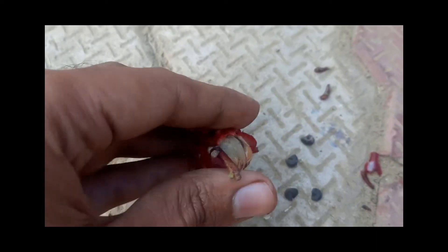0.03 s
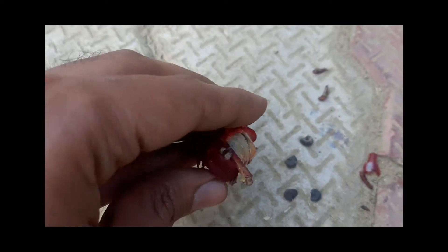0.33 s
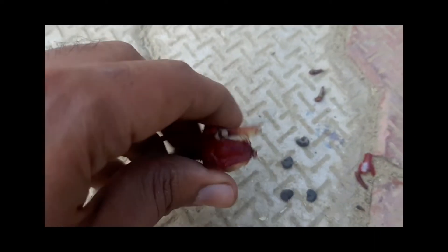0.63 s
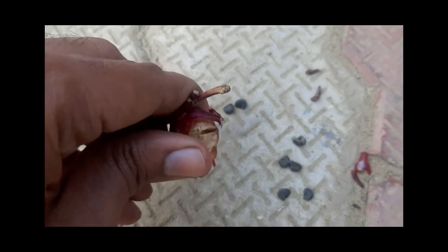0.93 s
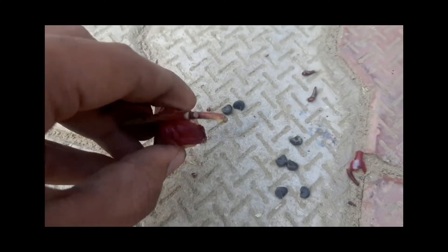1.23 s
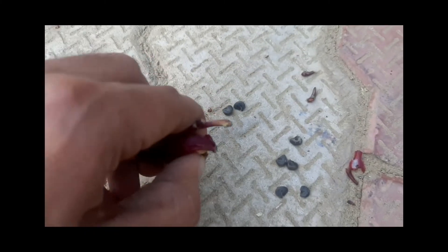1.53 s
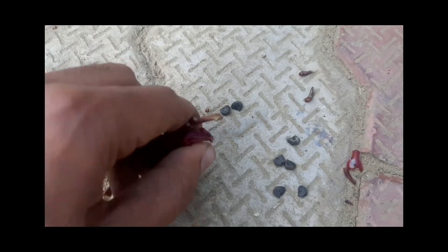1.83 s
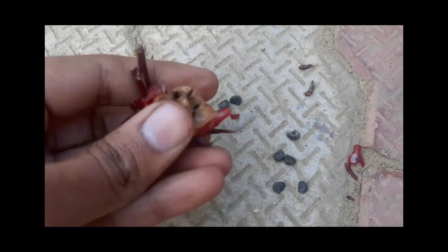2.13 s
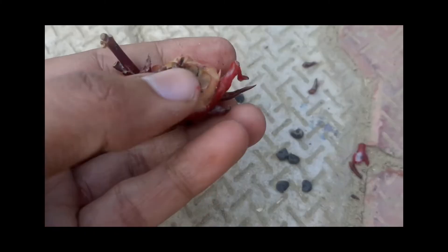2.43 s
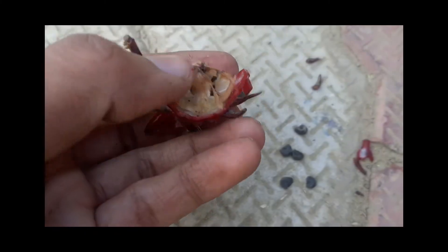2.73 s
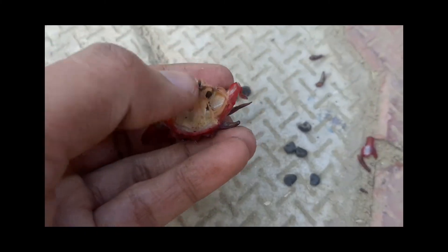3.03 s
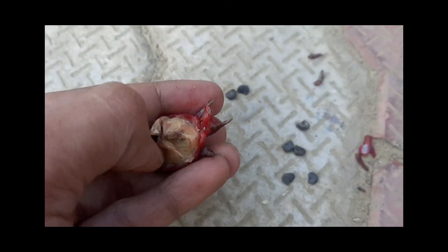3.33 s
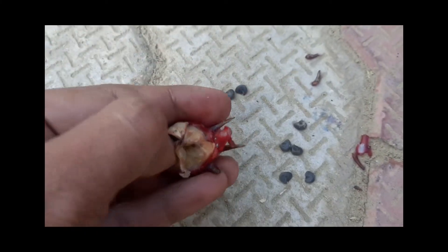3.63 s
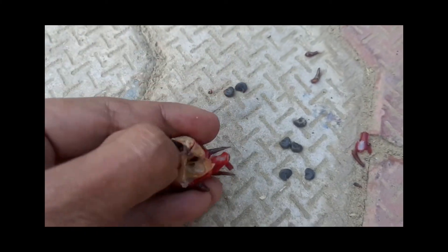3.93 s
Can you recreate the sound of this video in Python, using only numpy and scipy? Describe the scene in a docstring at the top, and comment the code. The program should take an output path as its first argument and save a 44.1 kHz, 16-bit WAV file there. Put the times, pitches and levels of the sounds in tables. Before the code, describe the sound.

A dry seed pod crackles as fingers squeeze it close to the microphone. Two bouts of tiny, crisp snaps thin out into faint rubbing, then a few more end in one sharp snap, over a low rumble and hum.

```python
"""A dry seed pod is squeezed and rolled between fingers, close to the microphone, over a tiled floor.
The husk fails by brittle fracture, in bouts of tiny snaps; each impulse excites the damped modes of
the shell for a millisecond or two. Finer crackle and the friction of skin on husk, a rub with faint
squeaks, fill the gaps. Behind the pod lie a low steady rumble and a mains hum."""
import sys
import numpy as np
from scipy import signal
from scipy.fft import rfft, irfft
from scipy.io import wavfile

SR = 44100
rng = np.random.default_rng(int(sys.argv[2]) if len(sys.argv) > 2 else 0)


def store_wav(level_fs):
    """Save 16-bit WAV to argv[1]."""
    pcm = np.round(np.clip(np.atleast_2d(level_fs), -1, 1) * 32767)
    wavfile.write(sys.argv[1], SR, pcm.T.astype(np.int16))


N = 176400
T = np.arange(N) / SR

# normal modes of the shell, in three groups: f/Hz, bandwidth/Hz, level within the group/dB
LOW_MODES = [(4400, 380, -10), (4686, 790, 3), (5830, 580, -1.5)]
MIDDLE_MODES = [(6830, 770, -7.5), (7060, 360, -5), (7650, 250, 0)]
HIGH_MODES = [(9700, 2400, -4), (11150, 1500, -1.5), (11970, 2600, -1.5), (13300, 930, 1.5),
              (14500, 1800, -3.5)]
FINGERS_PAN_DB = -4.5   # left minus right, for crackle and rub


def from_db(db):
    """Amplitude ratio of a level in decibels."""
    return 10 ** (np.asarray(db) / 20)


def rms_one(x):
    """Normalisation to unit root mean square."""
    return x / np.sqrt(np.mean(x ** 2) + 1e-30)


def energy_one(x):
    """Normalisation to unit energy."""
    return x / np.sqrt(np.sum(x ** 2) + 1e-30)


def in_time(points):
    """Linear interpolation of a time curve at every sample."""
    return np.interp(T, *np.transpose(points))


def in_frequency(points):
    """Interpolation of a spectrum at every Fourier bin, on a logarithmic frequency axis."""
    hz, value = np.transpose(points)
    return np.interp(np.log(np.fft.rfftfreq(N, 1 / SR) + 1), np.log(hz), value)


def pan(db):
    """Constant-power gains for a level difference, left minus right."""
    return rms_one(from_db(np.array([[db], [-db]]) / 2))


def drift(hz):
    """Random modulation: low-pass noise of unit rms."""
    lowpass = signal.butter(2, hz, fs=SR, output="sos")
    return rms_one(signal.sosfilt(lowpass, rng.standard_normal(N + SR))[SR:])


def coloured(x, spectrum):
    """Spectral shaping of noise, to unit rms."""
    return rms_one(irfft(rfft(x) * from_db(in_frequency(spectrum)), N))


def resonate(x, hz, width_hz):
    """Forced response of a damped oscillator with unit gain at resonance."""
    r = np.exp(-np.pi * width_hz / SR)
    feedback = [1, -2 * r * np.cos(2 * np.pi * hz / SR), r * r]
    return signal.lfilter(np.array([1, 0, -1]) * (1 - r * r) / 2, feedback, x + 1e-18)


def rumble():
    """Diffuse noise: the two sides are strongly correlated only at long wavelengths."""
    # envelope: t/s, level/dB
    levels = [(0, -59.5), (.25, -55.5), (1.2, -54.5), (2.4, -56), (3.7, -55), (3.86, -57.5), (4, -57.5)]
    # spectrum: f/Hz, relative spectral density/dB
    spectrum = [(20, -21), (30, -20.5), (48, 0), (70, 0.5), (140, 1.5), (250, -1), (340, -8.5), (410, -13),
                (560, -12.5), (800, -21.5), (1100, -20.5), (1500, -22.5), (1750, -31), (2200, -36),
                (2700, -50.5), (5500, -55.5), (7700, -47), (8400, -53.5), (9700, -65), (10500, -50),
                (15700, -44.5), (16100, -64)]
    # likeness of left and right: f/Hz, correlation coefficient
    correlation = [(60, 0.92), (130, 0.94), (290, 0.83), (640, 0.26), (1350, -0.62), (2500, 0.46),
                   (15000, -0.19)]
    alike = in_frequency(correlation)
    mid, side = rfft(rng.standard_normal((2, N)))
    noise = irfft(np.sqrt(1 + alike) * mid + np.sqrt(1 - alike) * side * [[1], [-1]], N)
    return from_db(in_time(levels)) * coloured(noise, spectrum)


def hum(fundamental_hz=100.42, waver_db=-0.7):
    """Mains hum: a series of odd harmonics, each under slow random amplitude modulation."""
    # envelope: t/s, level/dB
    levels = [(0, -86), (.13, -65), (.19, -50.5), (3.68, -50), (3.81, -52), (3.87, -72), (4, -67.5)]
    # line spectrum: harmonic number, relative level/dB
    harmonics = [(1, -0.5), (3, -18), (5, -26)]
    tone = 0
    for k, db in harmonics:
        amplitude = np.sqrt(2) * from_db(db + waver_db * drift(hz=2))
        tone += amplitude * np.sin(2 * np.pi * (k * fundamental_hz * T + rng.random()))
    return from_db(in_time(levels)) * tone


def radiate(x):
    """Radiation efficiency: a shell small against the wavelength gives off little sound."""
    return signal.sosfilt(signal.butter(5, 3900, "high", fs=SR, output="sos"), x)


def fracture(lead_s, swell_s=0.0011, tear_s=0.00045, scatter_s=0.0013):
    """Brittle fracture: a sharp crack at lead_s, which scatters among the fingers."""
    lead = int(lead_s * SR)
    t = T[:3 * lead] - T[lead]
    tear = 0.16 * rng.standard_normal(len(t)) * np.exp(-abs(t) / tear_s)
    tear[lead] += 1   # the break itself
    # a faint millisecond swell of noise leads into the crack
    swell = rng.standard_normal(len(t)) * np.exp(-abs(t) / swell_s) * (t < 0)
    scatter = rng.standard_normal((2, len(t))) * np.exp(-abs(t) / scatter_s) * (t > 0)
    force = energy_one(tear) + from_db(-14) * energy_one(swell)
    return force + from_db(-8) * np.sqrt(2) * energy_one(scatter)


def snap(force, middle_db, high_db, detune=0.047, side_spread_db=3.2, averaging_s=0.0024):
    """Modal superposition: each break strikes another spot, and each side hears another mix of modes."""
    out = 0
    for modes, group_db in ((LOW_MODES, 0), (MIDDLE_MODES, middle_db), (HIGH_MODES, high_db)):
        group = 0
        for k, (hz, width, mode_db) in enumerate(modes):
            gain = from_db(rng.normal(mode_db, 1) + side_spread_db * rng.standard_normal((2, 1)))
            detuned_hz = hz * (1 + detune * rng.uniform(-1.1, 1))
            group += (-1) ** k * gain * resonate(force, detuned_hz, width)
        out += from_db(group_db) * energy_one(radiate(group))
    return energy_one(out) * np.sqrt(2 * averaging_s * SR)   # energy of unit rms over averaging_s


def snaps(lead_s=0.01):
    """Impulse excitation: each fracture of the husk rings the shell, at its own time and direction."""
    # fractures: t/s, then relative levels/dB: whole snap, middle modes, high modes, left minus right
    fractures = [(0.1616, -73, -14, -15, -22), (0.4576, -71.5, -7, 0, 2), (0.7975, -54, 4, -16, -1),
                 (0.8035, -50.5, -6, -15, -5), (0.827, -43.5, -9, -25, -23), (0.8383, -47.5, 9, -1, 0),
                 (0.856, -62, -10, -20, -7), (0.868, -56, -2, -21, -1), (0.8727, -57, 7, -8, 2),
                 (0.8765, -57, -3, -19, -10), (0.9308, -53, 15, 7, -1), (0.964, -63, 10, 4, -6),
                 (0.988, -50.5, 8, 1, -6), (0.9933, -46.5, 22, 17, 1), (1.065, -62.5, -3, -7, -7),
                 (1.1716, -60.5, 2, -15, -6), (1.1913, -59.5, -10, -24, -23), (1.198, -60, 9, 10, 6),
                 (1.2593, -60, -1, -3, -5), (1.4143, -48.5, -10, -11, -9), (1.4216, -38.5, -5, -3.5, -5.5),
                 (1.4284, -54, -12, -13, -8), (1.4501, -48.5, -1, -26, 4), (1.455, -45.5, -5, -14, -18),
                 (1.4635, -48.5, 14, -9, 11), (1.4749, -57, -3, 2, -4), (1.4784, -39, 8, -1, -6.5),
                 (1.4903, -63, -10, -18, -1), (1.5074, -59, 3, 7, -4), (1.5263, -58, -5, -9, -11),
                 (1.5338, -45, 3, -13, -6), (1.5662, -59, 9, -5, -4), (1.573, -53.5, 4, -17, -9),
                 (1.5817, -56.5, -2, -13, -4), (1.6, -57, 2, -22, 0), (1.622, -61, 7, -9, -10),
                 (1.6295, -58.5, 12, 4, -6), (1.6633, -59, 7, 4, -8), (1.6978, -56, 6, -9, -10),
                 (1.7034, -57, 10, 13, -2), (1.7527, -65, -5, 4, -2), (1.7759, -58.5, -22, -19, -15),
                 (1.7789, -54.5, 2, -2, -7), (1.7943, -50, 2, 17, -5), (1.8131, -67, 2, -7, -6),
                 (1.9084, -55, 7, -2, -5), (1.9546, -65.5, -8, -7, 0), (2.0094, -65.5, -13, 3, -2),
                 (2.0138, -65.5, -17, -18, -13), (2.0362, -66.5, 1, 3, 1), (2.0702, -73, -1, -13, -4),
                 (2.0725, -62, 13, -8, 1), (2.0954, -65, 10, -9, -7), (2.121, -52.5, -2, -8, -10),
                 (2.1538, -65, -2, 5, -3), (2.6062, -71, 0, -24, -2), (2.7114, -74, -1, -8, -5),
                 (3.3717, -63.5, -10, -6, -1), (3.3944, -56, 17, 12, 0), (3.4356, -68, -4, -2, -3),
                 (3.4406, -63, 4, 19, -6), (3.5114, -67, -4, -19, -7), (3.6098, -62.5, 6, -6, -12),
                 (3.6147, -59, 15, 10, -1), (3.6577, -64.5, 13, 9, -3), (3.685, -43.5, -1.5, 18, 0)]
    out = np.zeros((2, N + SR))
    for s, db, middle_db, high_db, pan_db in fractures:
        sound = snap(fracture(lead_s), middle_db + 2, high_db + 6.5) * pan(pan_db)
        start = int((s - lead_s) * SR)
        out[:, start:start + sound.shape[1]] += from_db(db + 2.5) * sound
    return out[:, :N]


def crackle(breaks_per_s=1600, clump_db=4.5, clump_hz=85.5):
    """Shot noise: a Poisson stream of tiny breaks drives the shell's modes, swelling in clumps."""
    # envelope: t/s, level/dB
    levels = [(0, -108), (.26, -95), (.37, -87.5), (.53, -90), (.6, -91), (.77, -92.5), (.8, -69),
              (.88, -72), (1.04, -79), (1.2, -79), (1.38, -93), (1.42, -66), (1.58, -76.5), (1.73, -79.5),
              (1.85, -75.5), (2.05, -75.5), (2.15, -74), (2.24, -90.5), (3.32, -99), (3.37, -74),
              (3.66, -82), (3.76, -90.5), (4, -100)]
    onsets = np.flatnonzero(rng.random(N) < breaks_per_s / SR)
    sizes = from_db(-0.5 * np.minimum(rng.exponential(1, N), 4))[onsets]
    out = 0
    for modes, group_db in ((LOW_MODES, 0), (MIDDLE_MODES, -2), (HIGH_MODES, -1)):
        group = 0
        for hz, width, mode_db in modes:
            clicks = np.zeros((2, N))
            clicks[:, onsets] = sizes * rng.standard_normal((2, N))[:, onsets]
            group += from_db(mode_db) * resonate(clicks, hz, width)
        out += from_db(group_db) * rms_one(group)
    envelope = from_db(in_time(levels) + clump_db * drift(clump_hz))
    return envelope * rms_one(radiate(out)) * pan(FINGERS_PAN_DB)


def rub(uneven_hz=20, uneven_db=0.8, flutter_db=3.5):
    """Sliding friction of skin on husk: a broadband hiss, with narrower bands swelling as squeaks."""
    # envelope of the hiss: t/s, level/dB
    levels = [(0, -100), (.3, -86.5), (.75, -85.5), (.9, -80), (1.35, -79.5), (1.55, -72.5), (1.75, -78),
              (2.05, -77.5), (2.3, -83.5), (2.8, -82.5), (3.15, -80.5), (3.5, -76.5), (3.68, -82),
              (3.8, -87.5), (4, -90)]
    # spectrum of the hiss: f/Hz, relative spectral density/dB
    spectrum = [(1000, -23.5), (2100, 1), (2700, -2), (3400, -1.5), (5200, -2), (7400, -10.5), (8600, -18),
                (11000, -20.5), (15600, -26), (16200, -36)]
    # squeaks and scuffs: centre t/s, duration/s, f/Hz, resonator bandwidth/Hz, relative level/dB
    squeaks = [(0.365, 0.16, 5860, 894, -83), (0.531, 0.04, 6000, 2500, -78),
               (.53, 0.045, 12500, 4000, -77), (0.91, 0.3, 3100, 160, -85.5), (1.35, 0.6, 3120, 137, -87),
               (1.72, .14, 3100, 180, -97), (2.15, 0.32, 3470, 255, -82.5), (2.345, 0.24, 3500, 258, -92),
               (2.447, 0.14, 12600, 4530, -88), (2.53, 0.13, 3160, 240, -85)]
    envelope = from_db(in_time(levels) + uneven_db * drift(uneven_hz))
    out = envelope * coloured(rng.standard_normal((2, N)), spectrum)
    for s, duration, hz, width, db in squeaks:
        band = resonate(resonate(rng.standard_normal((2, N)), hz, width), hz, width)
        swell = np.exp(-(2 * (T - s) / duration) ** 2)
        out += from_db(db + 1 + flutter_db * drift(uneven_hz)) * swell * rms_one(band)
    return out * pan(FINGERS_PAN_DB)


def tiles(x, t60_s=0.08, delay_s=0.006, lowpass_hz=7200):
    """Reverberation: faint, dulled reflections from floor and surroundings decay exponentially."""
    t = T[:SR // 4]
    tails = rng.standard_normal((2, len(t))) * from_db(-60 * t / t60_s) * (t > delay_s)
    dull = signal.sosfilt(signal.butter(2, lowpass_hz, fs=SR, output="sos"), x)
    return from_db(-19) * signal.fftconvolve(dull, np.sqrt(2) * energy_one(tails), axes=1)[:, :N]


def scene(right_lag_s=0.00018):
    """Superposition of all sources; snaps and crackle reach the right side later and are reflected."""
    background = hum() + rumble() + rub()
    left, right = crackle() + snaps()
    pod = np.array([left, np.roll(right, int(right_lag_s * SR))])
    return pod + tiles(pod) + background


def record(dry, cutoff_hz=16450):
    """Filtering of the overall tone: a shallow dip near 8.5 kHz and a steep cut above 16 kHz."""
    notched = dry - 0.49 * resonate(dry, hz=8470, width_hz=3000)
    return signal.sosfilt(signal.ellip(10, .1, 70, cutoff_hz, fs=SR, output="sos"), notched)


dry = scene()
out = record(dry)
store_wav(out)
```